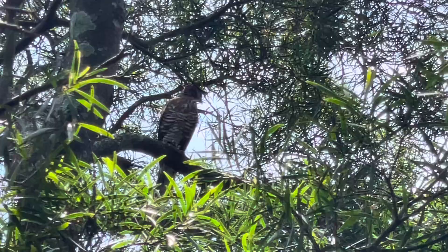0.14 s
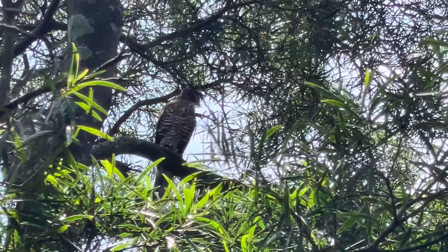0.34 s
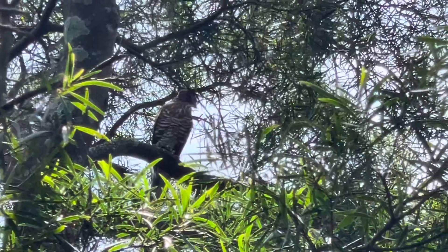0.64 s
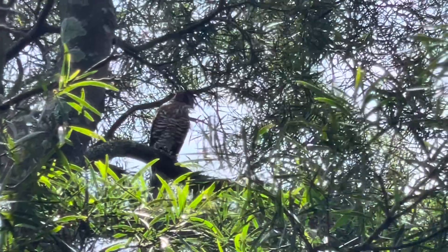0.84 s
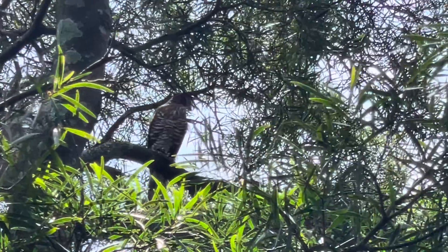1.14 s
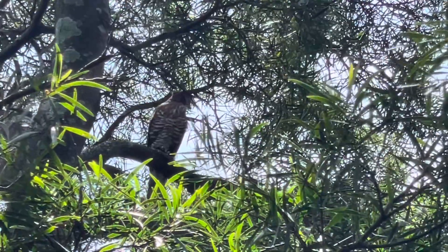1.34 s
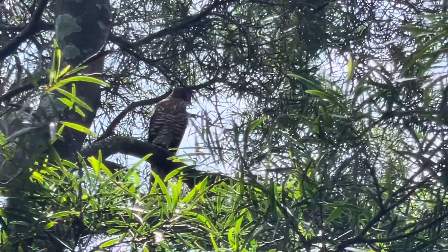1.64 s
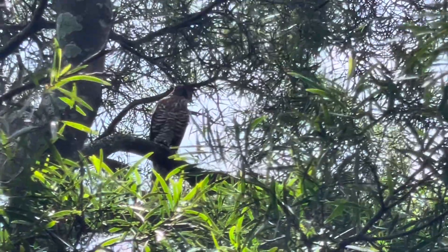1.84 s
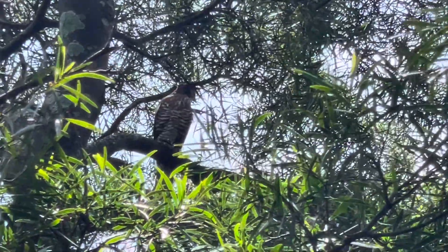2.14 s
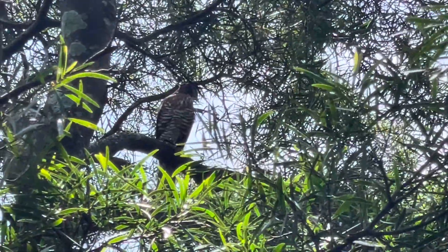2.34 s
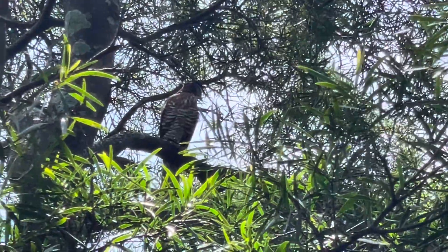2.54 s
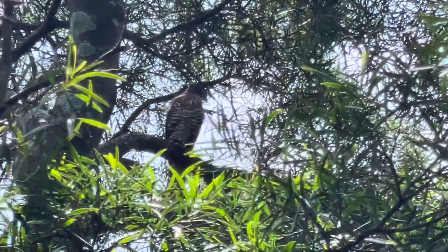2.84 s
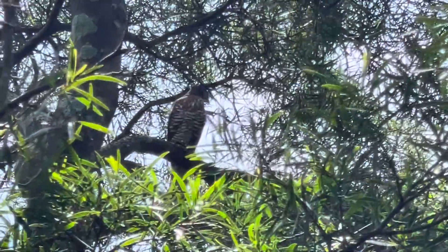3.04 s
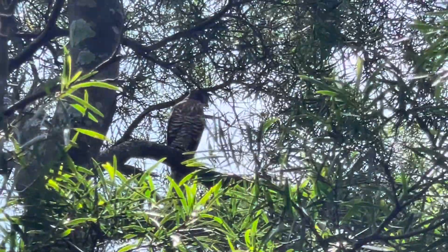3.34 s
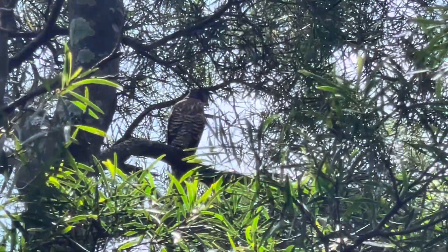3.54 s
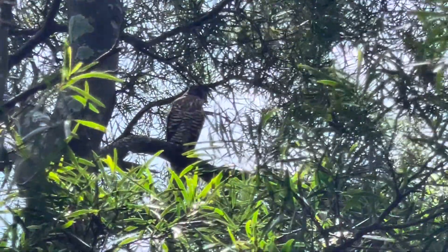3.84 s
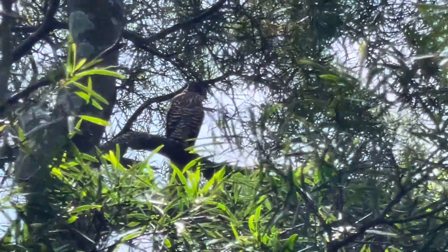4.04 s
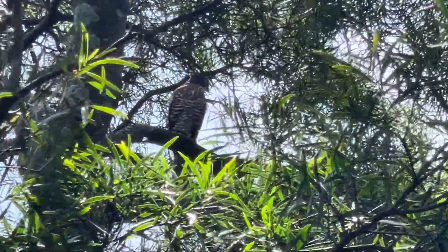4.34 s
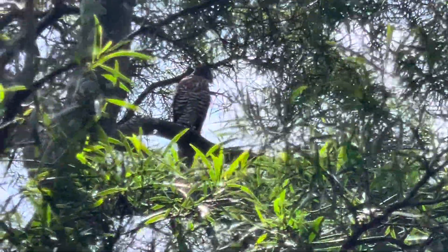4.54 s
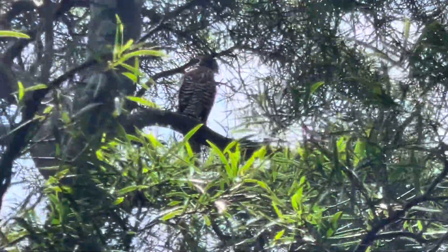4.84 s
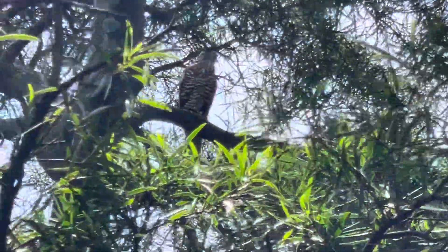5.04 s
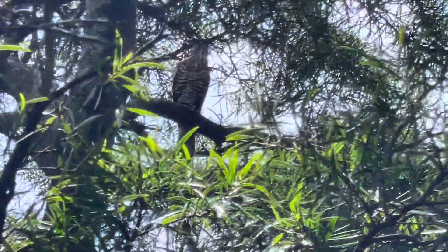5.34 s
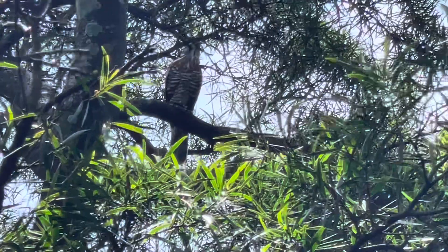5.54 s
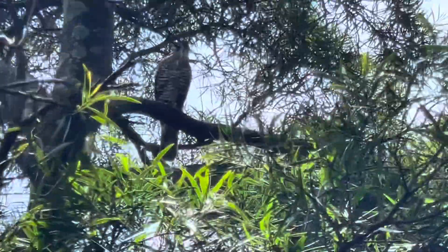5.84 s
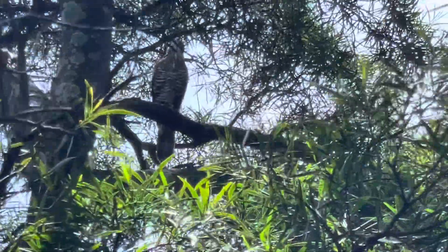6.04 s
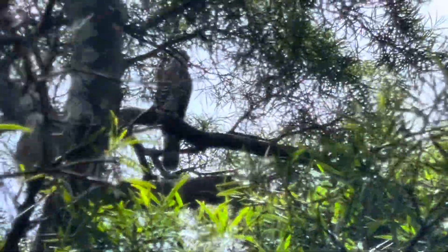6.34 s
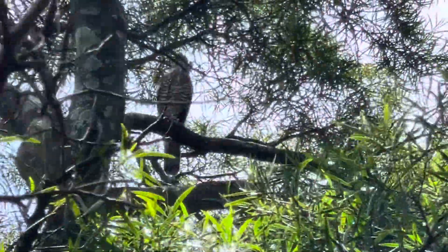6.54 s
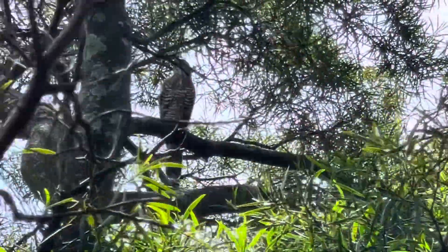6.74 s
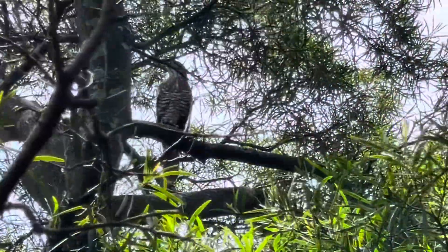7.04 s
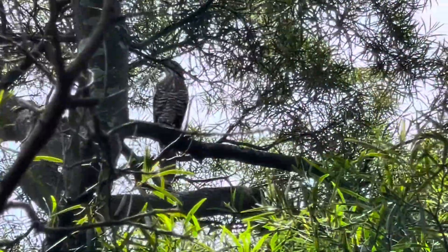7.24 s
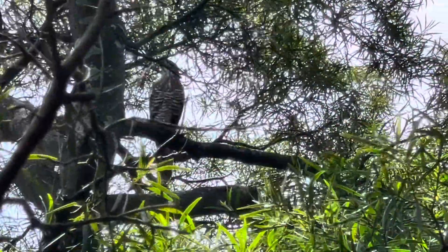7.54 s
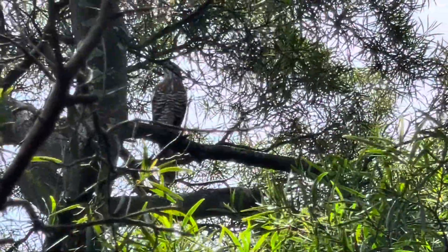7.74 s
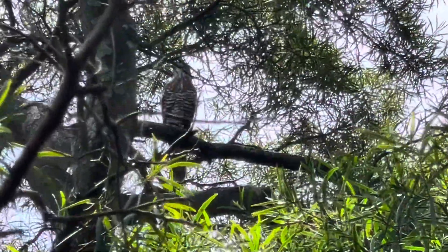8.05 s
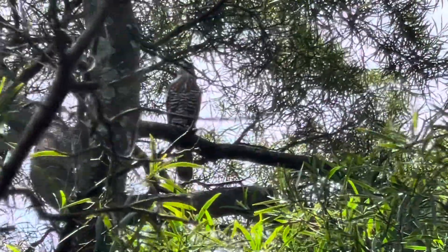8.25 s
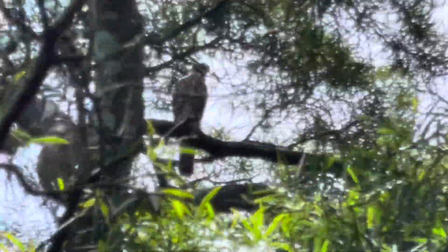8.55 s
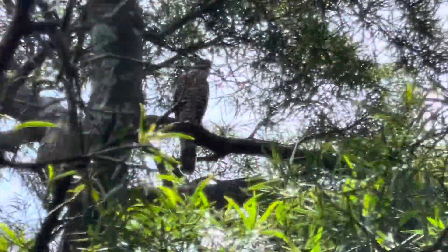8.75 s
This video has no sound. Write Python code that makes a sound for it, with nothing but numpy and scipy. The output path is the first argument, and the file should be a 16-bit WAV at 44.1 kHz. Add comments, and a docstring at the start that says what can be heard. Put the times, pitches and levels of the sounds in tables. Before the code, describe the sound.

Sharp, bright bird chirps repeat restlessly among trees, with faint birds behind, a dull far traffic hum, and small bumps on the camera.

```python
"""At the edge of a wood, a small bird scolds from a tree close to a two-port camera microphone.
Whistles bent in pitch, many with short arched chips after them, are sung as throat-shaped harmonics,
rasp and breath. The wood scatters that song and the twitters of birds far off. Distant traffic is shaped
noise with a wavering hum; breeze, hiss, a low rub of the hand on the camera, then a soft gust are shaped
noise too. Taps on the camera are decaying tones and clicks; soft grainy treble hisses swell and fade."""
import sys
import numpy as np
from scipy import signal
from scipy.fft import rfft, irfft, next_fast_len
from scipy.io import wavfile
from scipy.ndimage import uniform_filter1d, map_coordinates

SR = 44100
rng = np.random.default_rng(int(sys.argv[2]) if len(sys.argv) > 2 else 0)


def wav_record(signal):
    """Record a signal, one row per channel, as 16-bit PCM in the file named by sys.argv[1]."""
    frames = np.transpose(np.atleast_2d(signal))
    bounded = np.clip(frames, -1, 1)
    # unit amplitude maps onto the largest positive 16-bit level
    quanta = np.round(bounded * 32767).astype(np.int16)
    wavfile.write(sys.argv[1], SR, quanta)


N = 392931

EASY_HZ = 1611  # the pitch at which the near bird's effort adds no level


def amp(db):
    """Decibels to gain."""
    return 10 ** (np.asarray(db) / 20)


def unit(x):
    """x scaled to rms 1."""
    return x / np.sqrt(np.mean(x ** 2) + 1e-20)


def along(points, hz):
    """Values at hz from (f/Hz, value) points, joined on a log frequency axis."""
    f, values = np.transpose(points)
    return np.interp(np.log(hz + 1), np.log(f + 1), values)


def wobble(rate, size):
    """A smooth random curve with rate knots a second."""
    knots = rng.standard_normal(int(size * rate / SR) + 4)
    return map_coordinates(knots, [np.arange(size) * rate / SR])


def filtered(x, response):
    """x passed through a response, real or complex, given as a function of frequency."""
    m = next_fast_len(N + SR // 2)
    return irfft(rfft(x, m) * response(np.fft.rfftfreq(m, 1 / SR)), m)[..., :N]


def add(track, s, sound):
    """Mix a sound into a track at s seconds."""
    part = track[..., max(round(s * SR), 0):][..., :sound.shape[-1]]
    part += sound[..., :part.shape[-1]]


def contour(places, values, size):
    """A rounded line through values at places 0-1 along a note."""
    line = np.interp(np.linspace(0, 1, size), places, values)
    return uniform_filter1d(line, size // 8, mode="nearest")


def shaped(shape, length):
    """The columns of a note's shape, stretched to its length in seconds."""
    places, *columns = np.transpose(shape)
    return [contour(places, column, int(length * SR)) for column in columns]


def rush(spectrum):
    """Stereo noise of rms 1: a shared middle and an opposed side set how alike the two ports hear it."""
    # left-right likeness of the noise: f/Hz, correlation
    likeness = [(60, 1), (125, 0.9), (250, 0.84), (500, 0.6), (1000, 0.75), (2000, 0.936), (4000, 0.97),
                (7000, 0.25)]

    def response(hz):
        turn = np.arccos(np.clip(along(likeness, hz), -1, 1)) / 2
        return amp(along(spectrum, hz)) * [np.cos(turn), np.sin(turn)]
    mid, side = filtered(rng.standard_normal((2, N)), response)
    return unit(np.array([mid + side, mid - side]))


def traffic(rumble_db=-42, hum_db=-45, hum_hz=58, wander=0.0978):
    """Far engines: low noise with a drone whose pitch wanders round hum_hz."""
    # spectrum of the distant rumble: f/Hz, relative level/dB per Hz
    rumble_spectrum = [(12, -41), (20, -13.5), (42, -2), (59, -0.5), (72, 3.5), (113, -11.5), (160, -17),
                       (210, -47), (350, -120)]
    rumble = amp(rumble_db) * rush(rumble_spectrum)
    hz = hum_hz * (1 + wander * wobble(12, N))
    hum = unit(np.sin(2 * np.pi * np.cumsum(hz) / SR))
    return rumble + amp(hum_db) * hum


def breeze(level_db=-47.5):
    """Steady moving air: mostly low turbulent noise whose level wavers slightly."""
    # spectrum of the breeze: f/Hz, relative level/dB per Hz
    breeze_spectrum = [(65, -42), (110, -1), (119, -7.5), (201, -1), (233, -5.5), (300, -5.5), (437, -4),
                       (644, -9.5), (737, -10.5), (798, -13.5), (1190, -18), (1670, -31.5), (2700, -38.5),
                       (3510, -65.5), (5940, -120)]
    return amp(level_db + 0.84 * wobble(5, N)) * rush(breeze_spectrum)


def hiss(level_db=-73):
    """A faint high noise whose level drifts slowly."""
    # spectrum of the hiss: f/Hz, relative level/dB per Hz
    hiss_spectrum = [(1500, -2.5), (2400, -2.5), (3000, -1), (4200, -8.5), (5600, -13), (7500, -22),
                     (9000, -28), (13000, -21.5), (15000, -43)]
    return amp(level_db + 1.5 * wobble(1.5, N)) * rush(hiss_spectrum)


def swell_strength(calm_db=-58):
    """Strength of the low swells: each rises and dies away over a faint steady floor, powers adding."""
    # low swells, a handling rub and a gust:
    # t/s of the peak, level/dB, rise/s, fall/s (spreads of a bell curve)
    swell_list = [(2.7, -47, 0.51, 0.19), (4.25, -40, .24, 0.57)]
    t = np.arange(N) / SR
    power = amp(calm_db) ** 2
    for s, db, rise, fall in swell_list:
        distance = (t - s) / np.where(t < s, rise, fall)
        power = power + (amp(db) * np.exp(-distance ** 2 / 2)) ** 2
    return np.sqrt(power)


def rub_and_gust():
    """A low rub of the hand on the camera, then a soft gust: one dark rush of noise, swelling twice."""
    # spectrum of the low swells: f/Hz, relative level/dB per Hz
    swell_spectrum = [(53, -30), (90, -8.5), (98, -2.5), (134, -2.5), (247, -1.5), (407, -10), (476, -6.5),
                      (853, -14), (1070, -15.5), (2210, -36), (2700, -37), (3510, -59.5), (5940, -120)]
    return swell_strength() * rush(swell_spectrum)


def low_and_steady():
    """Traffic, air, hiss and rub at the two ports, set apart by a level and phase that vary with frequency."""
    # left over right port: f/Hz, level/dB
    tilt = [(60, -2.5), (125, -3.5), (250, -1.1), (1000, -.8), (2000, 0.5)]
    # phase by which the left port leads: f/Hz, phase/rad
    air_lead = [(60, 0.16), (125, 0.00059), (250, 0.46), (550, 1.89), (1000, 1.36), (1550, 1.16), (2000, 0)]

    def ports(hz):
        level_db = np.outer([.5, -.5], along(tilt, hz))
        phase = np.outer([.5, -.5], along(air_lead, hz))
        return amp(level_db) * np.exp(1j * phase)
    return filtered(traffic() + breeze() + rub_and_gust() + hiss(), ports)


def far_birds(trill_rate=22, sweep=0.09, chorus_db=-79, chorus_hz=4300, count=30):
    """Quick twitters that swing round one pitch: a few clear ones over a faint chorus."""
    # the clear calls, levels before the wood: t/s, length/s, f/Hz, level/dB
    far_calls = [(.78, 0.15, 4250, -74), (1.048, 0.2, 4170, -70), (3.481, .14, 4120, -70.5),
                 (3.619, 0.042, 2300, -63), (5.3, .18, 4050, -76.5), (5.55, 0.18, 4000, -73),
                 (6.83, 0.039, 2500, -70), (7.0, 0.19, 3930, -74), (8.5, 0.1, 4200, -74),
                 (8.7, .19, 3900, -79.5)]
    chorus = []
    for at, long, high in rng.random((count, 3)):
        chorus.append((at * N / SR, 0.056 + 0.2 * long, chorus_hz * (.8 + 0.45 * high), chorus_db))
    song = np.zeros(N)
    for s, length, hz, db in list(far_calls) + chorus:
        size = int(length * SR)
        swing = np.sin(2 * np.pi * trill_rate * np.arange(size) / SR) + .8 * wobble(120, size)
        tone = np.sin(2 * np.pi * np.cumsum(hz * (1 + sweep * swing)) / SR)
        add(song, s, amp(db) * unit(tone * signal.windows.hann(size)))
    return song


def wood(x, near_db=6, near_t60=0.35, width=0.28):
    """Nearby leaves add a louder decay alike at all frequencies, farther trunks a tail that varies with
    frequency; the swaying paths keep changing."""
    # tail of the farther trunks: f/Hz, t60/s
    trunk_t60 = [(2000, 0.26), (6500, 0.49), (12000, 0.07)]
    out, hop = np.zeros((2, N)), SR // 3
    for centre in range(0, N + hop, hop):
        hz, t, z = signal.stft(rng.standard_normal((2, SR // 2)), SR, nperseg=256)
        far_decay = amp(-60 * t / along(trunk_t60, hz)[:, None])
        near_decay = amp(near_db - 60 * t / near_t60)
        mid, side = signal.istft(z * (far_decay + near_decay), SR, nperseg=256)[1]
        tail = np.array([mid + width * side, mid - width * side])
        tail /= np.linalg.norm(tail[0])
        # overlapping triangles crossfade from one random tail to the next
        index = np.arange(max(centre - hop, 0), min(centre + hop, N))
        piece = x[index] * (1 - abs(index - centre) / hop)
        add(out, index[0] / SR, signal.fftconvolve(piece[None], tail, axes=1))
    return out


def treble_hisses(crackle_db=3):
    """Soft grainy treble hisses that swell and fade, some perhaps echoes of the calls."""
    # hisses, level at the crest: t/s, length/s, level/dB
    hiss_list = [(1.06, 0.18, -71), (1.68, 0.19, -77), (2.352, 0.33, -73), (6.74, 0.26, -65.5),
                 (7.62, 0.32, -71)]
    # spectrum of these hisses: f/Hz, relative level/dB per Hz
    grainy_spectrum = [(900, -23), (2500, 3), (5000, -1), (7000, -14), (9000, -34), (12500, -1),
                       (15000, -34)]
    swell = np.zeros(N)
    for s, length, db in hiss_list:
        add(swell, s, amp(db) * signal.windows.hann(int(length * SR)))
    return swell * unit(amp(crackle_db * wobble(300, N)) * rush(grainy_spectrum))


def taps(attack=0.0008, click_t60=0.0063, overtone=2.8, overtone_db=-7, thud_hz=110, thud_t60=0.028):
    """A finger tap: a tiny click, a few cycles of two casing modes, and a low thud as the body is pushed."""
    # taps on the camera, before the ring is doubled and the whole coloured:
    # t/s, level/dB, ring f/Hz, ring t60/s, click level/dB to the ring, thud level/dB to the ring
    tap_list = [(1.083, -46, 1300, 0.013, 11, -4), (1.112, -55, 1300, .006, 10, -8),
                (2.517, -23.5, 665, 0.0081, -12, -6.5), (2.564, -35, 394, 0.018, -23, -5),
                (2.686, -40, 1230, 0.0057, -16, 5), (2.7632, -20.5, 460, 0.012, -19.5, -11),
                (6.096, -49, 1667, 0.0078, -20, -17), (6.114, -49, 1690, 0.0076, -8, -12),
                (6.336, -50.5, 1390, 0.013, -22, -16)]
    out, t = np.zeros((2, N)), np.arange(SR // 10) / SR

    def mode(hz, t60):
        return np.sin(2 * np.pi * hz * t) * amp(-60 * t / t60) * (1 - np.exp(-t / attack))

    for s, db, hz, t60, click_db, thud_db in tap_list:
        ring = mode(hz, t60) + amp(overtone_db) * mode(overtone * hz, t60 / 2)
        thud = amp(thud_db) * mode(thud_hz, thud_t60)
        click = amp(click_db - 60 * t / click_t60) * rng.standard_normal((2, len(t)))
        add(out, s, amp(db) * (2 * (ring + thud) + click))
    colour = [(1500, 3), (2600, 0.5), (6000, -4), (14000, -10)]  # f/Hz, level/dB
    return filtered(out, lambda hz: amp(along(colour, hz)))


def effort_db(hz, full_hz=1766, louder_db_per_octave=41):
    """More air pressure makes a note both higher and louder, until full strength at full_hz."""
    return louder_db_per_octave * np.log2(np.minimum(hz, full_hz) / EASY_HZ)


def note(pitch, level_db, rasp_db, bright_db, jitter=0.0089, flutter_db=2.5, shift_db=1.3,
         rasp_jitter=.25, breath_db=-19, effort=0.22, blur=0.11):
    """One note: syrinx harmonics, rasp from every second cycle being weaker, and breath, throat-shaped."""
    # throat and beak, which favour the fourth harmonic: f/Hz, level/dB
    throat = [(1700, -35), (3000, -8.5), (3600, -16), (4300, -12.5), (5100, -13.5), (5500, -18.5),
              (5950, 3), (7300, -2.5), (7900, -4.5), (8800, -34.5), (9800, -17.5), (11300, -25.5),
              (12800, -32.5), (15300, -32)]
    size = len(pitch)
    hz = pitch * (1 + jitter * wobble(900, size))
    phase = 2 * np.pi * np.cumsum(hz) / SR + rng.uniform(0, 2 * np.pi)
    # the top harmonics fade first
    top_db = bright_db + effort * (level_db - np.percentile(level_db, 70))
    voice = np.zeros(size)
    for k in range(1, 11):
        # beak and head keep moving
        own_db = flutter_db * wobble(70.7, size) + shift_db * rng.standard_normal() * (k != 4)
        # uneven cycles blur the high harmonics most
        stray = blur * max(k - 4, 1) * wobble(800, size)
        gain = amp(along(throat, k * hz) + own_db + top_db * (k > 5))
        voice += gain * np.sin(k * phase + stray)
    # rasp: half harmonics between the whole ones
    for k in np.arange(3, 10) + .5:
        between_db = (along(throat, (k - .5) * hz) + along(throat, (k + .5) * hz)) / 2
        gain = amp(rasp_db + between_db + 2.7 * wobble(150, size))
        voice += gain * np.sin(k * phase + rasp_jitter * wobble(500, size))
    breath_gain = amp(1.04 * along(throat, np.fft.rfftfreq(size, 1 / SR)))
    breath = unit(irfft(rfft(rng.standard_normal(size)) * breath_gain, size))
    sound = np.sqrt(2) * voice + amp(breath_db) * breath
    return sound * amp(level_db) * signal.windows.tukey(size, .1)


def whistle(length, start_hz, end_hz, db, rasp_db=-24, rasp_db_per_octave=70, rasp_spread_db=2.0,
            bright_db=3.0):
    """A note that flicks up, glides, and drops off as the air pressure falls; the lower, the raspier."""
    # shape of every whistle: place 0-1, share of the glide done, pitch factor, level/dB
    whistle_shape = [(0, 0, .94, -7.5), (.09, 0, 1.018, -1.5), (.26, 0, .992, 0), (.53, .4, 1, .2),
                     (.73, 1, 1.007, 1.2), (.84, 1, .985, -3), (1, 1, .86, -14)]
    glide, bend, edge_db = shaped(whistle_shape, length)
    hz = start_hz + (end_hz - start_hz) * glide
    low_rasp_db = rasp_db_per_octave * np.log2(EASY_HZ / hz)
    rasp = rasp_db + low_rasp_db + rasp_spread_db * rng.standard_normal()
    return note(hz * bend, db + effort_db(hz) + edge_db, rasp, bright_db)


def chip(length, hz, db, rasp_db=-17, bright_db=3):
    """A short arch of pitch, loudest at its crest."""
    # shape of every chip: place 0-1, pitch factor, level/dB
    chip_shape = [(0, .92, -15), (.19, .985, -3.5), (.44, 1.01, 1.5), (.61, .985, -2.5), (.85, .87, -15),
                  (1, .83, -24)]
    bend, edge_db = shaped(chip_shape, length)
    return note(hz * bend, db + effort_db(hz) + edge_db, rasp_db, bright_db)


def near_bird(chip_db=.5, pause_s=.003, period_s=.055, chip_s=.047, shrink=.82):
    """Each whistle runs straight into its chips, if any; a few short rows are lone arched notes or peeps."""
    # whistles with their chips, and a few short lone notes; levels at the easy pitch before the throat:
    # t/s, whistle or lone note length/s, starting f/Hz, final f/Hz, level/dB, [f/Hz of each chip]
    calls = [(0.053, 0.074, 1623, 1475, -54.5, []), (.112, 0.066, 1555, 1614, -52.5, [1674]),
             (0.387, 0.13, 1493, 1655, -49, [1734]), (.635, 0.092, 1595, 1614, -50, []),
             (0.742, .024, 1600, 1510, -57, []), (0.884, 0.12, 1602, 1633, -51, [1750]),
             (1.131, .102, 1576, 1653, -49.5, [1709]), (1.44, .12, 1503, 1640, -49, [1810, 1840, 1720]),
             (1.976, .112, 1498, 1640, -49.5, [1750, 1700]), (2.291, 0.11, 1500, 1604, -50, [1724]),
             (2.518, 0.11, 1566, 1630, -48.8, [1740]), (2.752, 0.1, 1590, 1650, -51.5, [1720]),
             (3.038, 0.12, 1527, 1580, -50.5, [1800, 1810]), (3.308, 0.096, 1594, 1580, -50, []),
             (3.554, 0.1, 1493, 1607, -49.5, [1668]), (3.797, 0.11, 1505, 1654, -49, [1740]),
             (4.032, 0.084, 1624, 1620, -48.5, [1690]), (4.196, 0.042, 1806, 1833, -49, []),
             (4.257, .036, 1706, 1740, -52.5, []), (4.427, 0.093, 1492, 1512, -49, [1620]),
             (4.764, 0.12, 1467, 1630, -49.5, [1690]), (5.06, 0.094, 1480, 1556, -50.5, [1645, 1715]),
             (5.781, .131, 1484, 1610, -52, [1760]), (6.439, 0.14, 1453, 1647, -49, [1780, 1836]),
             (6.765, 0.067, 1603, 1490, -51.8, [1630]), (7.301, 0.14, 1470, 1600, -51.5, [1731]),
             (7.544, .062, 1643, 1575, -49.5, [1657]), (7.808, 0.1, 1475, 1634, -48, [1728, 1803]),
             (8.053, 0.064, 1684, 1628, -47, []), (8.144, 0.02, 1540, 1450, -51.5, []),
             (8.215, 0.077, 1615, 1651, -48.5, []), (8.396, 0.078, 1512, 1560, -50.5, [1730]),
             (8.835, 0.096, 1474, 1550, -51.5, [])]
    song = np.zeros(N)
    for s, length, start_hz, end_hz, db, chips in calls:
        add(song, s, whistle(length, start_hz, end_hz, db))
        # chips come at an even pace and grow shorter
        for k, hz in enumerate(chips):
            chip_at = s + length + pause_s + k * period_s
            add(song, chip_at, chip(chip_s * shrink ** k, hz, db + chip_db))
    return song


def scene(echo_db=-9, treble_echo_db=4):
    """Birdsong reaches the two ports out of step; the far birds arrive only as scattered sound."""
    # phase by which birdsong leads at the left port: f/Hz, phase/rad
    song_lead = [(5100, 0.79), (5850, -1.6), (6250, -1.2), (6700, -0.65), (7150, -1.24), (7550, -3),
                 (7950, -2), (8400, -3.5), (9300, -2.5), (11000, -4.5), (12600, -6.4)]

    def leaves(hz):
        # narrow leaves scatter short waves best
        return amp(echo_db + treble_echo_db * np.clip((hz - 8000) / 2000, 0, 1))

    def ports(hz):
        return np.exp(1j * np.outer([.5, -.5], along(song_lead, hz)))

    bird = near_bird()
    song = bird + wood(filtered(bird, leaves) + far_birds())
    return low_and_steady() + treble_hisses() + taps() + filtered(song, ports)


def record(dry, bass_cut_hz=33, top_hz=15850):
    """The camera rolls off the deepest bass and keeps nothing from its band limit up."""
    def response(hz):
        bass_cut = hz ** 3 / np.sqrt(hz ** 6 + bass_cut_hz ** 6)
        return (hz < top_hz) * bass_cut
    return filtered(dry, response)


dry = scene()
out = record(dry)
wav_record(out)
```